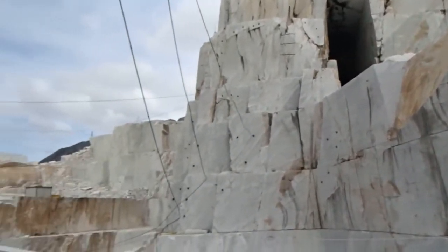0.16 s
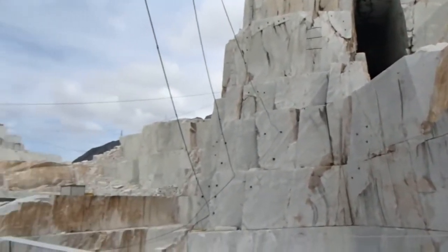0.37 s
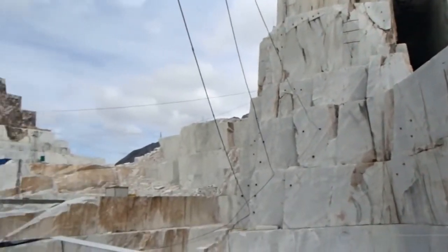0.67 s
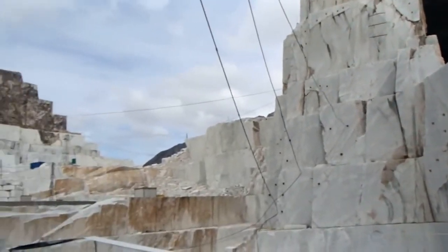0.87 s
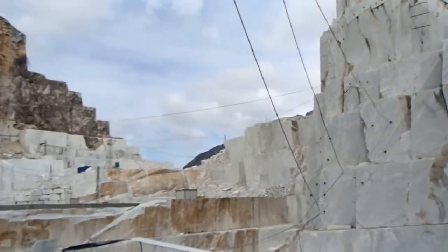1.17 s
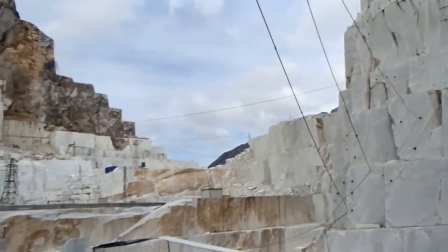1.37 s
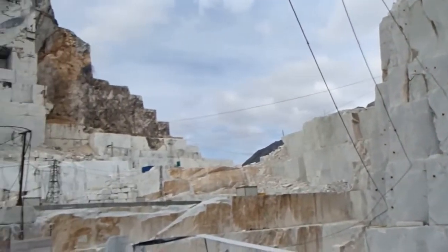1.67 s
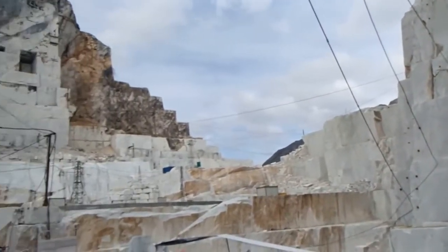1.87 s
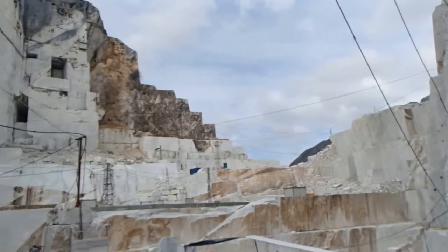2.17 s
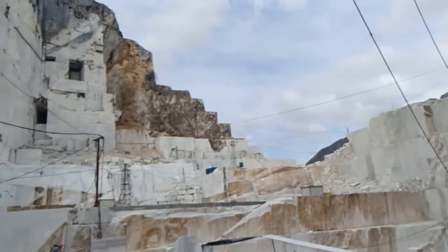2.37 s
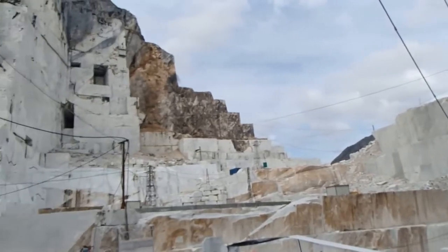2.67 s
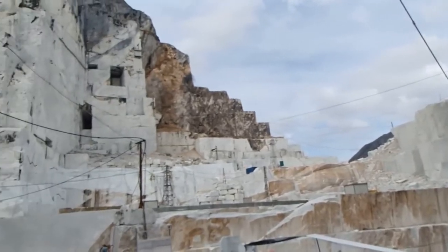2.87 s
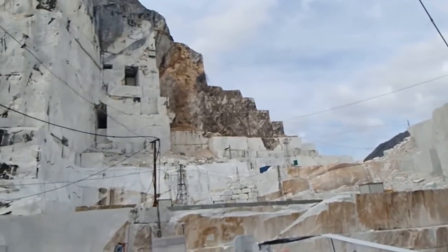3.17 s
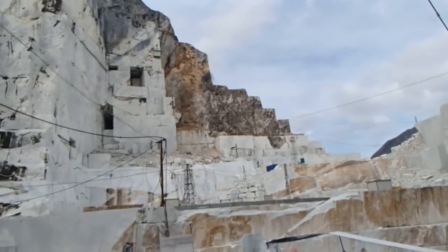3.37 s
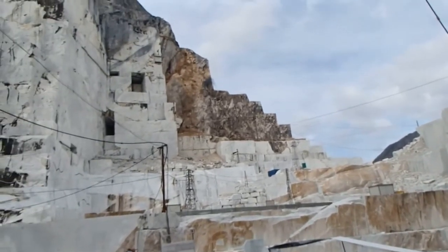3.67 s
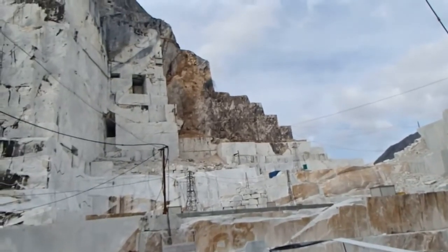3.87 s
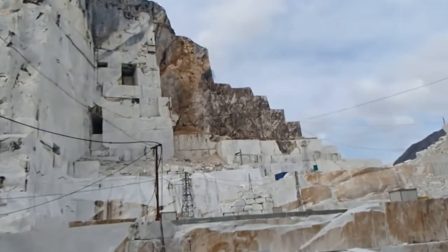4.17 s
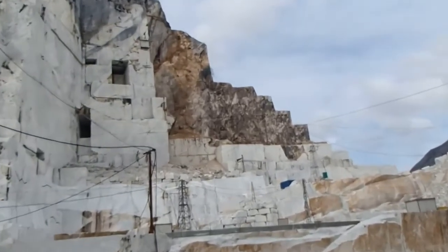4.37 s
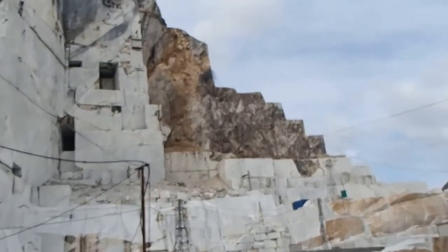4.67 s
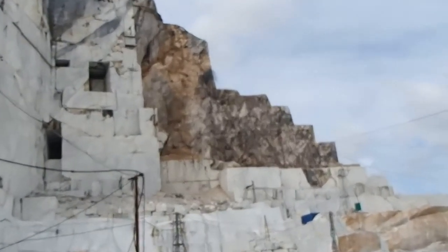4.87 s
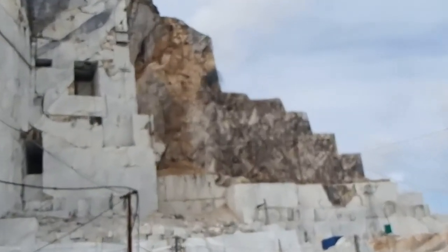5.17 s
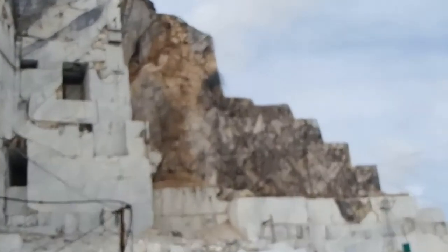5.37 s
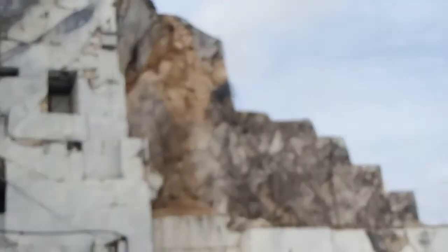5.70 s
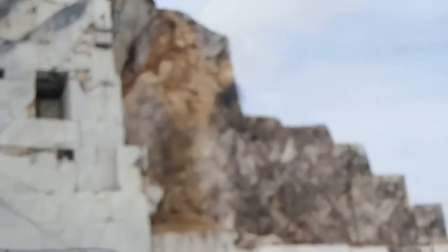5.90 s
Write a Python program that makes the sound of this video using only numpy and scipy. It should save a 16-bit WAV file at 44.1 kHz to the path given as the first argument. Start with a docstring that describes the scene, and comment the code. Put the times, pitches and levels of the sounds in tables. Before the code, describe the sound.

Steady, loud sawing of stone outdoors, already running at the start and still running at the end. The wire's thin whine dips and flickers in a quick looping rhythm, with a few short dropouts. Rough mid-range grinding and bright water spray surround it, echoing densely off rock walls. Wavering motor tones, diesel drone, housing hum and low pit rumble fill the background. The mono camera microphone pans away early, making the spray smoother and the grinding less direct.

```python
"""A high whine over harsh grinding: a diamond wire saw cuts marble some way off in an open quarry.
The microphone rides on a camera that pans away from the cut. The whine is a tone tied to the drive's turning,
sinking at the same places every lap of the wire; grit rings resonances of slot, wheel and beads.
Cooling water hisses as showers of tiny drops. Electric drives and diesels are wavering steady tones,
housings, roar and pit rumble are filtered noise, and the stone faces add dense echoes."""
import sys
import numpy as np
from scipy import signal
from scipy.fft import rfft, irfft
from scipy.io import wavfile

SR = 44100
rng = np.random.default_rng(int(sys.argv[2]) if len(sys.argv) > 2 else 0)


def pcm_store(signal):
    """Save signal as 16-bit PCM."""
    levels = np.round(np.clip(np.atleast_2d(signal), -1, 1) * 32767)
    wavfile.write(sys.argv[1], SR, levels.astype(np.int16).T)


N = 266364

# Camera panning away from the cut. Each row: time in seconds, share of the direct hiss from 0 to 1.
FACING_CURVE = [(0, 0.78), (.9, 0.55), (2, 0.05), (6.04, 0.05)]

# The wire is a closed loop: time of one lap, and when its joint first passes the cut, in seconds.
LAP_S, JOINT_S = 0.654, 0.22
# Mean turning rate of the drive, and the whine and lower note as multiples of it.
TURN_HZ, WHINE_ORDER, LOW_ORDER = 41.97, 33, 30
# Whine between its slips and breaks. Each row: time in seconds, level in dB.
WHINE_CURVE = [(0, -23), (.33, -20.5), (1.35, -20.5), (2.2, -23), (6.04, -23.5)]
# Stretches of the loop where the beads bite less and the whine sinks.
# Each row: place in seconds into the lap, half-length in seconds, depth in dB, deepening in dB per second.
LOOP_SLIPS = [(0.01, 0.043, 10.5, -1.5), (.21, .025, 1.5, 0), (0.347, .045, 1, 1), (0.477, 0.046, 1, 1),
              (0.588, 0.03, 10.5, -1)]
# Moments when the whine dips briefly. Each row: time in seconds, half-length in seconds.
WHINE_BREAKS = [(0.22, 0.028), (1.46, 0.015), (2.68, 0.034), (5.126, 0.037), (5.28, 0.033), (5.807, 0.025)]
BREAK_DB = 15  # drop of the whine in a break
# Lower note of the wire: resting level, and the height, time and half-length of its one swell.
LOW_DB, LOW_SWELL_DB, LOW_SWELL_S, LOW_HALF_S = -42, 17, .59, 0.22
# Weaker lines around the whine. Each row: multiple of the drive's turning rate, level in dB.
DRIVE_LINES = [(31, -39), (32, -41), (34, -40), (35, -36.5), (36, -32), (37, -38), (38, -42), (39, -35),
               (40, -38), (41, -39.5), (42, -40), (43, -35)]

# Resonances that the grit excites, in the slot in the stone, the drive wheel and the beads.
# Each row: frequency in Hz, width in Hz, relative gain in dB.
SLOT_RESONANCES = [(991, 160, -5.5), (1134, 41, 1.5), (1263, 465, -3.5), (1500, 560, -3)]
WHEEL_RESONANCES = [(1858, 510, -2.5), (2038, 255, 2), (2218, 267, -5)]
BEAD_RESONANCES = [(2880, 370, 0), (3210, 475, -0.5), (3654, 600, -10), (4080, 430, -16)]
# Base level with the camera turned away, and what fully facing the cut adds, in dB.
KERF_DB, KERF_FACING_DB = -24.5, -1
WHEEL_DB, WHEEL_FACING_DB = -21.5, -4.5
RASP_DB, RASP_FACING_DB = -29.5, 5
# Slot and wheel surge or slacken as the wire bites or lets go.
# Each row: time in seconds, half-length in seconds, change in dB.
BITE_CHANGES = [(0.132, 0.046, 5), (.215, 0.021, -4.5), (0.27, 0.023, 5), (.81, 0.025, -1),
                (0.93, 0.067, 1.5), (2.128, .015, -2), (2.453, 0.021, -7), (4.1, .03, -0.5),
                (4.283, 0.035, 0)]

# Spectrum of the drops. Each row: frequency in Hz, relative level in dB.
SPRAY_SPECTRUM = [(3000, -14), (4600, -11.5), (5150, -12), (5650, -3.5), (6100, -3.5), (6550, -4.5),
                  (7400, 0), (8900, -3.5), (10700, -2.5), (12000, -8.5), (13300, -14), (15600, -25)]
# Spray base level turned away, and what fully facing the cut adds, in dB.
SPRAY_DB, SPRAY_FACING_DB = -36.5, 1.5
# The spray ebbs once a lap: place in seconds into the lap, swing either way with the camera turned away.
SPRAY_EBB_S, SPRAY_SWING_DB = 0.29, 0.65
# Spurts and falters of the spray. Each row: time in seconds, half-length in seconds, change in dB.
SPRAY_SPURTS = [(.23, 0.037, 1.5), (.55, .08, -1), (.82, .04, -2.5), (.94, .04, 2), (1.62, .04, 2),
                (2.44, .02, -3.5), (3.34, .03, 1), (4.27, .03, 2)]

# Steady tones of the electric drives. Each row: frequency in Hz, level in dB.
MOTOR_LINES = [(390, -46.5), (1096, -34.5), (1113, -44.5), (2195, -34.5), (2810, -69), (2901, -56.5),
               (3290, -51.5), (3611, -48)]
# Drone of the diesel machines. Each row: frequency in Hz, level in dB.
DIESEL_LINES = [(58, -58), (72, -55), (100, -58), (115, -47.5), (155, -40), (166, -46.5), (177.3, -37.5),
                (208.5, -46.5), (300, -51.5)]
# Humming resonances of the machines' housings. Each row: frequency in Hz, width in Hz, relative gain in dB.
HOUSING_RESONANCES = [(208.7, 27, -3.5), (303.6, 32, -3), (358.5, 19, -0.5), (410.2, 23, -6.5),
                      (828.3, 27, -1.5)]
# Spectrum of the quarry's broad roar. Each row: frequency in Hz, relative level in dB.
ROAR_SPECTRUM = [(20, -35), (60, -29), (90, -5.5), (140, -5), (220, 2), (330, -3.5), (440, -1), (560, 1.5),
                 (750, -2.5), (1000, -7), (2500, -5.5), (5000, -37.5)]
# Roar before its slow wander. Each row: time in seconds, level in dB.
ROAR_CURVE = [(0, -28), (1.3, -28.2), (2.7, -30), (4.2, -28), (6.04, -27.5)]
# Spectrum of the deep rumble of the pit. Each row: frequency in Hz, relative level in dB.
RUMBLE_SPECTRUM = [(20, -22), (34, -17), (43, 1), (75, 5), (110, -9), (250, -35)]
# Gain on the rumble. Each row: time in seconds, gain in dB.
RUMBLE_CURVE = [(0.05, -43), (1.9, -52), (2.0, -43), (2.67, -47), (3.53, -43), (4.71, -50), (6.0, -46)]

TOP_HZ = 15600  # upper edge of the microphone's band


def undb(db):
    """Decibels to gain."""
    return 10 ** (np.asarray(db) / 20)


def level(x, db):
    """Scale a sound to an rms level in dB."""
    return x * undb(db) / np.sqrt(np.mean(x ** 2))


def controls(table):
    """The columns of a curve table, one value per sample."""
    s, *columns = np.transpose(table)
    return [np.interp(np.arange(N) / SR, s, c) for c in columns]


def walk(rate):
    """Smooth chance of rms 1 that changes about rate times a second."""
    hz = np.fft.rfftfreq(N, 1 / SR)
    smoothed = rfft(rng.standard_normal(N)) / (1 + (hz / rate) ** 2)
    return level(irfft(smoothed, N), 0)


def swell(offset, half):
    """A smooth bump, 1 at offset 0."""
    return np.exp(-(offset / half) ** 2)


def surges(table):
    """The level change in dB from a table of brief swells and dips."""
    t = np.arange(N) / SR
    return sum(db * swell(t - at, half) for at, half, db in table)


def lap_offset(at):
    """Seconds from the nearest moment at which a given place on the loop passes the cut."""
    since = np.arange(N) / SR - JOINT_S - at
    return (since + LAP_S / 2) % LAP_S - LAP_S / 2


def colour(x, points):
    """Filter by a spectrum of (Hz, dB) points, joined along log frequency."""
    hz, db = np.transpose(points)
    bins = np.fft.rfftfreq(N, 1 / SR) + 1  # the 1 Hz shift avoids log of zero
    gain = undb(np.interp(np.log(bins), np.log(hz), db))
    return irfft(rfft(x) * gain, N)


def resonate(x, hz, width_hz):
    """A resonance applied twice, so that its skirts are steep."""
    b, a = signal.iirpeak(hz, hz / width_hz, fs=SR)
    once = signal.lfilter(b, a, x)
    return signal.lfilter(b, a, once)


def grains(rate, scatter_db):
    """Tiny impacts at random moments, rate a second, their random strengths scattered further in dB."""
    hit = rng.random(N) < rate / SR
    strength = undb(scatter_db * np.minimum(rng.exponential(size=N), 5))
    return hit * rng.standard_normal(N) * strength


def tone(hz, scatter, fade_rate):
    """A line of rms 1: the direct tone plus wall echoes whose sum keeps shifting in size and phase."""
    phase = 2 * np.pi * np.cumsum(hz * np.ones(N)) / SR + rng.uniform(0, 2 * np.pi)
    echoes = scatter * (walk(fade_rate) + 1j * walk(fade_rate)) / np.sqrt(2)
    return level(np.real((1 + echoes) * np.exp(1j * phase)), 0)


def walls(x, t60=1.35, wet_db=-3):
    """Add the dense decaying echo of the stone faces and bring the sum to rms 1."""
    t = np.arange(SR) / SR
    decay = np.exp(-np.log(1000) * t / t60)
    tail = rng.standard_normal(SR) * decay * (t > .03)  # first echo after 30 ms
    echo = signal.fftconvolve(x, tail)[:N]
    return level(level(x, 0) + level(echo, wet_db), 0)


def wire():
    """Beads strike stone at a nearly steady rate, slipping at set places each lap; the drive adds lines around."""
    t = np.arange(N) / SR
    full_db, = controls(WHINE_CURVE)
    slip_db = sum((depth + deepening * t) * swell(lap_offset(at), half)
                  for at, half, depth, deepening in LOOP_SLIPS)
    break_db = BREAK_DB * sum(swell(t - at, half) for at, half in WHINE_BREAKS)
    whine_db = full_db - slip_db - break_db
    low_db = LOW_DB + LOW_SWELL_DB * swell(t - LOW_SWELL_S, LOW_HALF_S)
    turn_hz = TURN_HZ * (1 + 0.000962 * walk(2.286))  # the load makes the speed waver
    whine = undb(whine_db) * tone(WHINE_ORDER * turn_hz, scatter=.1, fade_rate=8)
    low_note = undb(low_db) * tone(LOW_ORDER * turn_hz, scatter=0.22, fade_rate=5.1)
    comb = sum(undb(db) * tone(order * turn_hz, scatter=0.44, fade_rate=5.7) for order, db in DRIVE_LINES)
    return whine + low_note + comb


def scrape(modes, rate, scatter_db):
    """Countless diamond scratches ring a set of resonances, echoed by the walls."""
    rings = [undb(db) * resonate(grains(rate, scatter_db), hz, width) for hz, width, db in modes]
    return walls(sum(rings))


def grinding():
    """Grit rings slot, wheel and beads; bites move the first two, the pan shifts the balance, all flutter."""
    facing, = controls(FACING_CURVE)
    bite_db = surges(BITE_CHANGES)
    kerf_db = KERF_DB + KERF_FACING_DB * facing + bite_db + 0.74 * walk(6.5)
    wheel_db = WHEEL_DB + WHEEL_FACING_DB * facing + bite_db
    rasp_db = RASP_DB + RASP_FACING_DB * facing + 0.5 * walk(7.3)
    kerf = undb(kerf_db) * scrape(SLOT_RESONANCES, rate=9000, scatter_db=1.0)
    wheel = undb(wheel_db) * scrape(WHEEL_RESONANCES, rate=9000, scatter_db=1.0)
    rasp = undb(rasp_db) * scrape(BEAD_RESONANCES, rate=7000, scatter_db=3.0)
    shared_flutter_db = 0.4 * walk(11)
    return (kerf + wheel + rasp) * undb(shared_flutter_db)


def spray():
    """Fine drops of water and slurry fly off, ebbing once a lap, drier and less even while the camera faces them."""
    facing, = controls(FACING_CURVE)
    lap_phase = 2 * np.pi * lap_offset(SPRAY_EBB_S) / LAP_S
    ebb_db = SPRAY_SWING_DB * (1 + facing) * np.cos(lap_phase)
    drops = walls(colour(grains(rate=16000, scatter_db=0.0), SPRAY_SPECTRUM), t60=0.71, wet_db=-6.5)
    near_drops = resonate(grains(rate=14000, scatter_db=-2.0), 6900, 2700)
    direct = level(near_drops, -1.7) * facing  # without wall echoes
    hiss = (drops + direct) / np.sqrt(1 + 0.56 * facing ** 2)  # offsets most of the added power
    flicker_db = .65 * walk(24)
    spray_db = SPRAY_DB + SPRAY_FACING_DB * facing - ebb_db + surges(SPRAY_SPURTS) + flicker_db
    return hiss * undb(spray_db)


def motors():
    """Electric drives sing at fixed pitches, wavering as their wall echoes shift."""
    return sum(undb(db) * tone(hz, scatter=0.44, fade_rate=2.4) for hz, db in MOTOR_LINES)


def diesels():
    """Diesel machines drone on fixed low tones that waver a little faster than the motors'."""
    return sum(undb(db) * tone(hz, scatter=0.43, fade_rate=3.2) for hz, db in DIESEL_LINES)


def housings():
    """Broad noise rings the resonances of the machines' housings into a hum."""
    hums = [undb(db) * resonate(rng.standard_normal(N), hz, width) for hz, width, db in HOUSING_RESONANCES]
    return level(sum(hums), -37.5)


def quarry_roar():
    """The quarry's broad roar: coloured noise smeared by the walls, slowly wandering in level."""
    roar_db, = controls(ROAR_CURVE)
    roar = walls(colour(rng.standard_normal(N), ROAR_SPECTRUM))
    return roar * undb(roar_db + 0.5 * walk(0.67))


def pit_rumble():
    """The deep rumble of the pit: low coloured noise that rises and sinks."""
    gain_db, = controls(RUMBLE_CURVE)
    return level(colour(rng.standard_normal(N), RUMBLE_SPECTRUM), -2.5) * undb(gain_db)


def scene():
    """The saw and the quarry around it, in one channel."""
    saw = wire() + grinding() + spray()
    quarry = motors() + diesels() + housings() + quarry_roar() + pit_rumble()
    return (saw + quarry)[None]


def record(dry):
    """The microphone rounds the highest peaks and a steep low-pass cuts the top."""
    drive = 1.0
    rounded = np.tanh(drive * dry) / drive
    top_cut = signal.ellip(12, .1, 80, TOP_HZ, fs=SR, output="sos")
    return signal.sosfilt(top_cut, rounded)


dry = scene()
out = record(dry)
pcm_store(out)
```